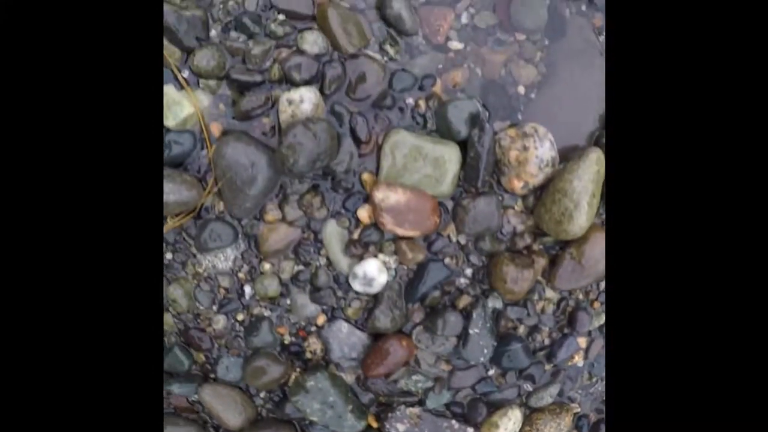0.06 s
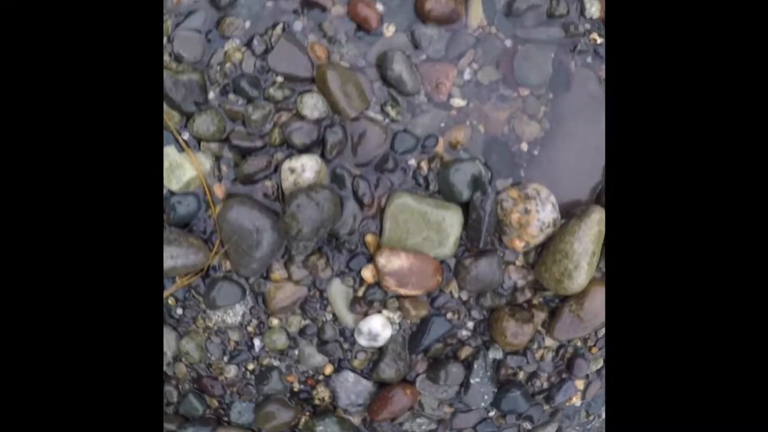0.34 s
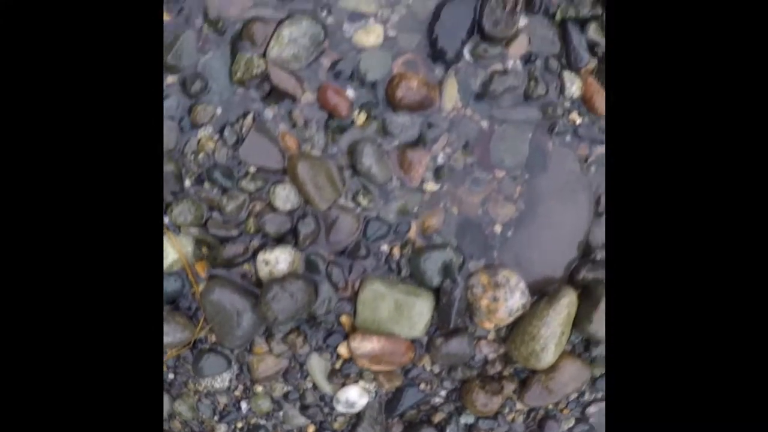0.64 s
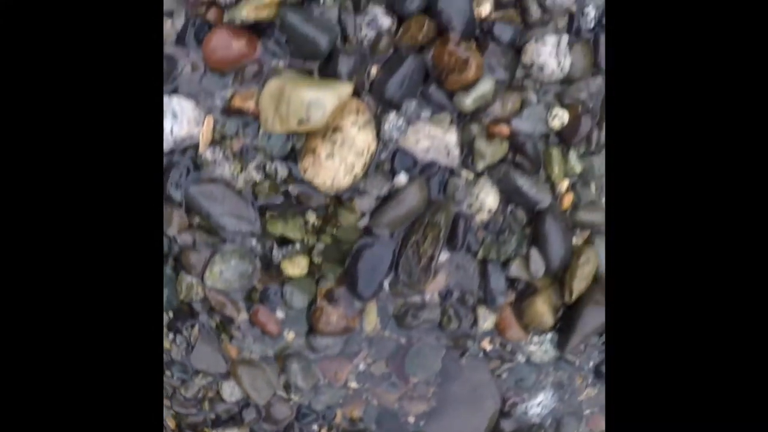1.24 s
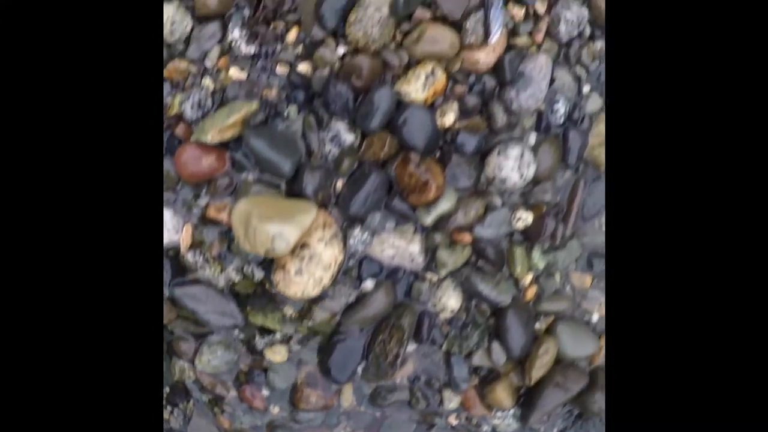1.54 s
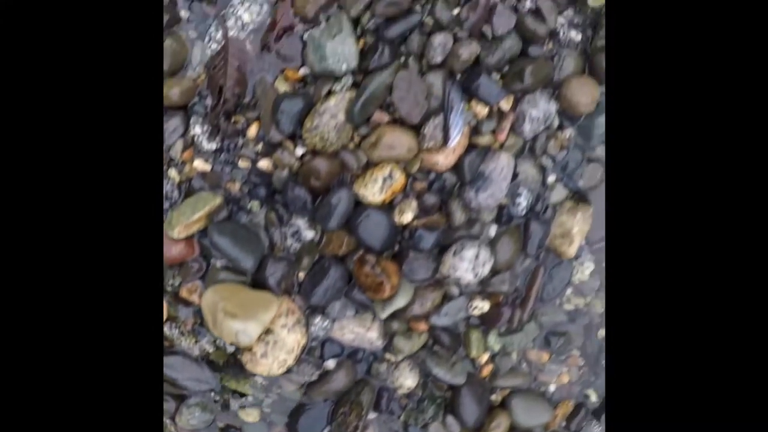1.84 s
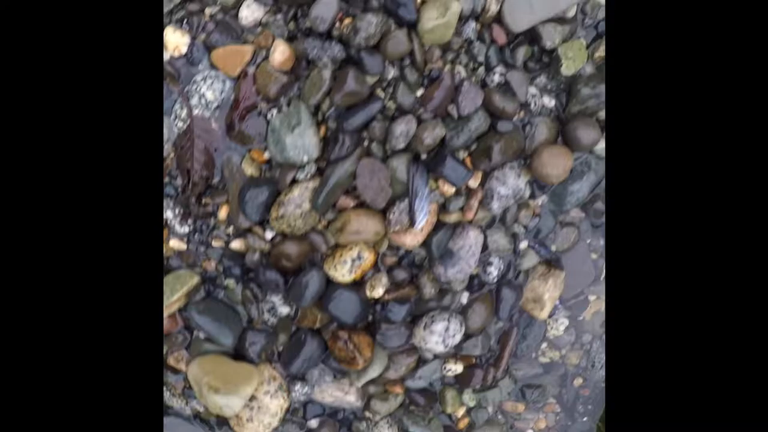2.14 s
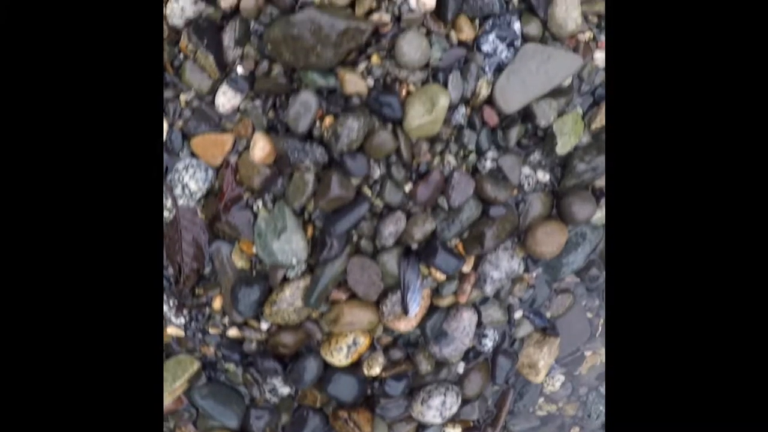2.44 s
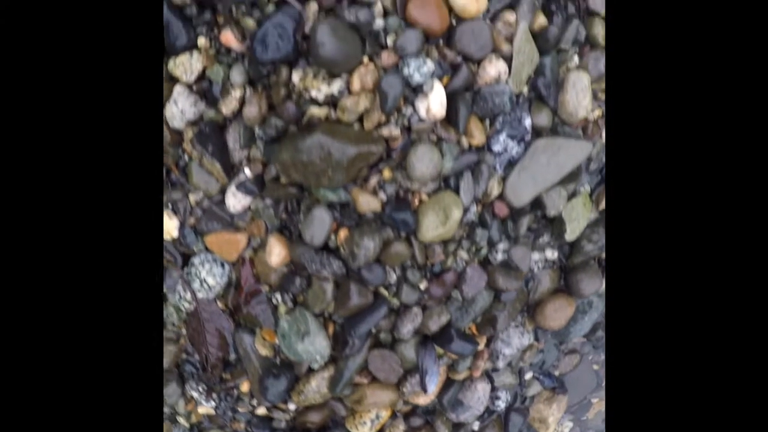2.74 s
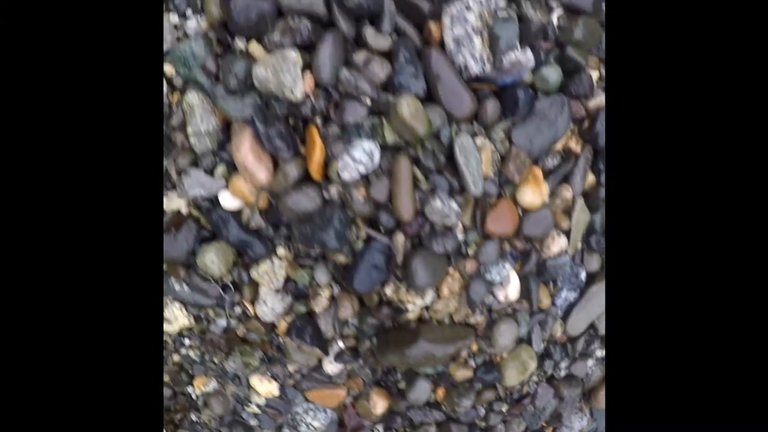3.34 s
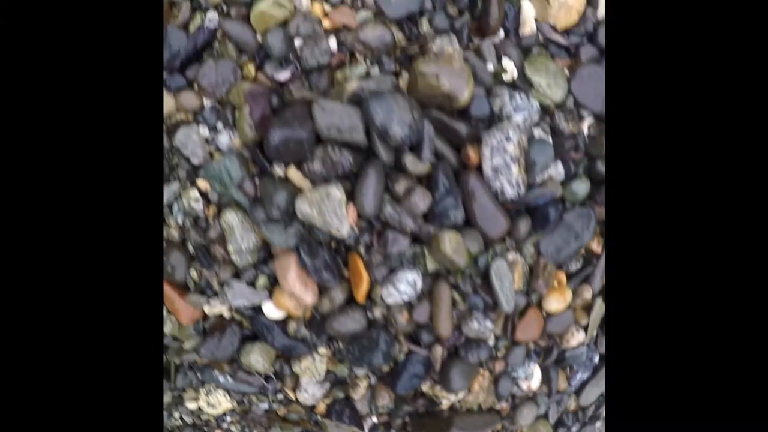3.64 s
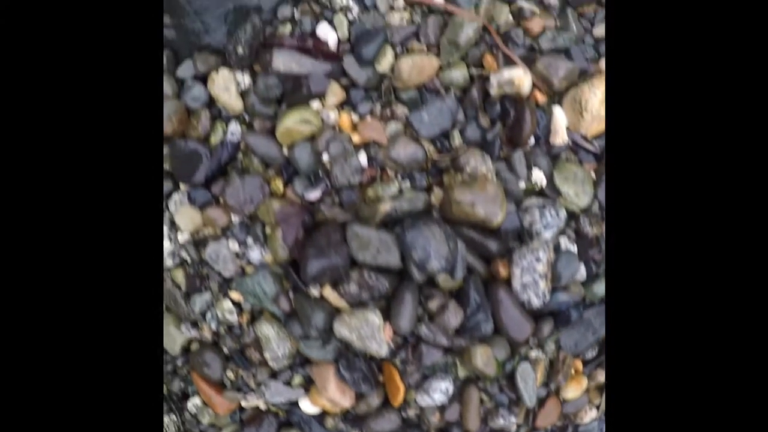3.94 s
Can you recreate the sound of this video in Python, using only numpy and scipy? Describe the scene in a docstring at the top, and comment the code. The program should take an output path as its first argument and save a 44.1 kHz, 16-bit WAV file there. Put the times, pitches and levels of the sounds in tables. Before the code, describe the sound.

Slow footsteps crunch on a wet pebble beach. The first sinks into fine, hissing shingle; the next ones grind coarser stones that knock, click and skid. Low wind rumbles on the close microphone over a faint wash of water.

```python
"""Slow footsteps on a wet pebble beach.

The first step sinks into wet, fine shingle; the next ones grind coarser pebbles, which knock,
click, ring and skid. The crunch is many small stone contacts, each ringing briefly.
Low wind rumbles on two microphones pointing at the ground, over a faint wash of water."""
import sys
import numpy as np
from scipy import signal
from scipy.fft import rfft, irfft, next_fast_len
from scipy.io import wavfile
from scipy.ndimage import uniform_filter1d

SR = 44100
rng = np.random.default_rng(int(sys.argv[2]) if len(sys.argv) > 2 else 0)


def generate_wav(sig):
    """Save sig (samples, or channels by samples) to the path in sys.argv[1] as 16-bit PCM at SR."""
    pcm = np.round(np.clip(np.atleast_2d(sig).T, -1, 1) * 32767).astype(np.int16)
    wavfile.write(sys.argv[1], SR, pcm)


N = 176400
TIME_S = np.arange(N) / SR
FFT_SIZE = next_fast_len(N + SR // 4)
BIN_HZ = np.maximum(np.arange(FFT_SIZE // 2 + 1) * SR / FFT_SIZE, 1)
TOP_HZ = 8400


def from_db(db):
    """Decibels to gain."""
    return 10 ** (np.asarray(db) / 20)


def envelopes(rows):
    """One gain curve over time per dB column."""
    times_s, *columns = np.transpose(rows)
    return [from_db(np.interp(TIME_S, times_s, db)) for db in columns]


def per_bin(points):
    """Table interpolated over log frequency."""
    hz, value = np.transpose(points)
    return np.interp(np.log(BIN_HZ), np.log(hz), value)


def minimum_phase(colour):
    """Causal response of a colour, at unit power gain."""
    gain = from_db(per_bin(colour))
    cepstrum = irfft(np.log(gain / np.sqrt(np.mean(gain ** 2))), FFT_SIZE)
    cepstrum[1:FFT_SIZE // 2] *= 2
    cepstrum[FFT_SIZE // 2 + 1:] = 0
    return np.exp(rfft(cepstrum))


# Left-right likeness: f/Hz, coherence
COHERENCE = [(60, 0.91), (500, 0.97), (1350, 0.91), (1850, 1), (2150, 1), (2600, 0.34), (3400, 0.8),
             (4700, 0.23), (5700, 0.16), (8000, 0.098)]
def to_stereo(pair, colour, scatter=1):
    """Colour a direct and a scattered signal; mix them as mid and side."""
    direct, scattered = rfft(pair, FFT_SIZE) * minimum_phase(colour)
    side_share = np.clip(scatter * (1 - per_bin(COHERENCE)) / 2, 0, .5)
    mid = np.sqrt(1 - side_share) * direct
    side = np.sqrt(side_share) * scattered
    return irfft([mid + side, mid - side], FFT_SIZE)[:, :N]


# Wind strength: t/s, level/dB
WIND_LEVEL = [(0, -25), (.3, -35), (.7, -30.5), (1.1, -34.5), (1.8, -38.5), (2.4, -38.5), (2.8, -32),
              (3.05, -39), (3.5, -47), (3.7, -40), (4, -50)]
# Wind and water spectra: f/Hz, relative level/dB
WIND_COLOUR = [(6, -14.5), (14, 1.5), (26, 3), (42, -10.5), (69, 0.5), (82, -5.5), (100, -6.5), (135, -23),
               (300, -31), (700, -69)]
WASH_COLOUR = [(100, 2.5), (700, 0.5), (1300, -5.5), (2200, -10), (3400, -9), (4000, -1), (4800, -2.5),
               (5700, -12), (7000, -19), (7800, -48)]
def shore():
    """Wind rumbles on the microphones over a steady wash of water."""
    gusts, = envelopes(WIND_LEVEL)
    wind = to_stereo(gusts * rng.standard_normal((2, N)), WIND_COLOUR)
    wash = to_stereo(rng.standard_normal((2, N)), WASH_COLOUR)
    return wind + from_db(-62) * wash


def contacts(per_s, spread_db):
    """Random stone contacts of uneven size, with the running RMS held at 1."""
    sizes = from_db(spread_db * np.minimum(rng.exponential(1, N), 3))
    clicks = sizes * (rng.random(N) < per_s / SR)
    power = np.maximum(uniform_filter1d(clicks ** 2, size=2600), 0)
    return clicks / np.sqrt(power + 1e-6)


def pebbles(per_s, spread_db, t60_cycles, rub_db):
    """Each contact rings short modes at random strengths, over smooth rubbing noise."""
    clicks = contacts(per_s, spread_db)
    hits = np.flatnonzero(clicks)
    modes_hz = np.geomspace(120, 9000, 40)
    out = np.zeros((2, N))
    for hz, spacing_hz in zip(modes_hz, np.gradient(modes_hz)):
        strengths = rng.standard_normal((2, len(hits))) * np.sqrt(rng.exponential(1, len(hits)))
        drive = np.full((2, N), 1e-18)
        drive[:, hits] = clicks[hits] * strengths
        radius = from_db(-60 * hz / (t60_cycles * SR))
        gain = np.sqrt((1 - radius ** 2) * spacing_hz / SR)
        feedback = [1, -2 * radius * np.cos(2 * np.pi * hz / SR), radius ** 2]
        out += signal.lfilter([gain, 0, -gain], feedback, drive)
    return out + from_db(rub_db) * rng.standard_normal((2, N))


def chinks(per_s, t60_cycles):
    """Loose pebbles ring briefly, each at one pitch of its own."""
    draws = rng.random((5000, 4))
    sounding = draws[:, 3] < per_s * N / SR / len(draws)
    onset, pitch, size, _ = draws[sounding].T
    hz = 150 * 55 ** pitch
    lengths = (SR * t60_cycles / hz).astype(int)
    pebble = np.repeat(np.arange(len(hz)), lengths)  # all rings laid end to end
    age = np.arange(len(pebble)) - (np.cumsum(lengths) - lengths)[pebble]
    cycles = hz[pebble] * age / SR
    envelope = (1 - np.exp(-cycles)) * from_db(-60 * age / lengths[pebble])
    rings = ((.5 + size) * hz)[pebble] * envelope * np.sin(2 * np.pi * cycles)
    out = np.bincount((onset * N).astype(int)[pebble] + age, rings, minlength=N)[:N]
    return out / np.std(out) * np.sqrt(TOP_HZ / (SR / 2))


def loose(per_s, t60_cycles, db):
    """Ringing pebbles, direct and scattered."""
    return from_db(db) * np.array([chinks(per_s, t60_cycles), chinks(per_s, t60_cycles)])


# Work of the feet on the ground: t/s, deep stones/dB, top pebbles/dB, grit/dB
TREAD_LEVELS = [(0, -46.5, -55, -60), (.34, -49, -53, -73.5), (.55, -44, -45, -81), (.59, -44, -40, -59),
                (.77, -35, -33.5, -41.5), (.92, -33.5, -39.5, -39.5), (1.12, -38, -45, -51.5),
                (1.22, -42.5, -49, -60.5), (1.45, -35.5, -37.5, -50), (1.58, -35.5, -43.5, -41.5),
                (1.63, -47, -48, -50.5), (1.78, -49.5, -56, -59.5), (2.14, -49.5, -52, -60.5),
                (2.26, -39.5, -46, -66), (2.34, -32.5, -35, -49.5), (2.42, -34.5, -33, -53.5),
                (2.48, -29.5, -28.5, -35), (2.53, -30.5, -32, -48), (2.61, -35, -31.5, -50),
                (2.68, -35, -41.5, -57), (2.76, -36, -37, -56), (2.84, -36, -37.5, -56.5),
                (3.12, -41.5, -49, -63.5), (3.17, -31, -43, -56), (3.235, -37, -37, -45),
                (3.29, -35, -42, -53), (3.39, -35.5, -39.5, -44), (3.45, -50.5, -44.5, -47.5),
                (3.54, -50, -54.5, -57), (3.66, -50.5, -51.5, -52.5), (3.86, -48, -56.5, -63.5),
                (4, -39.5, -48, -68)]
# Layer spectra: f/Hz, relative level/dB
DEEP_COLOUR = [(50, -25.5), (170, -1), (320, -7.5), (500, 4), (760, 3), (1000, -6), (4000, -79.5)]
PEBBLE_COLOUR = [(200, -17), (800, -6), (1200, 3), (1500, -3), (1950, -13.5), (2600, -18), (4000, -23),
                 (8000, -83)]
GRIT_COLOUR = [(600, -12), (1800, -5.5), (2600, -1.5), (3400, 2), (4050, -8.5), (4800, -4), (5600, -16),
               (6800, -23), (7700, -58)]
def crunch():
    """Weight shifts deep stones, crunches the top pebbles and grinds the grit between them."""
    deep, top, grit = envelopes(TREAD_LEVELS)
    shifting = pebbles(per_s=380, spread_db=2.5, t60_cycles=6.9, rub_db=-7.5)
    shifting += loose(per_s=400, t60_cycles=21, db=-8)
    crunching = pebbles(per_s=450, spread_db=2, t60_cycles=8.7, rub_db=-7)
    crunching += loose(per_s=740, t60_cycles=53, db=-2.5)
    grinding = pebbles(per_s=600, spread_db=3, t60_cycles=20, rub_db=-3)
    grinding += loose(per_s=600, t60_cycles=150, db=-2.5)
    return (to_stereo(deep * shifting * from_db(-1), DEEP_COLOUR)
            + to_stereo(top * crunching * from_db(-1), PEBBLE_COLOUR)
            + to_stereo(grit * grinding, GRIT_COLOUR, scatter=2))


# Low pulses: t/s, half-width/s, f/Hz, level/dB
THUMPS = [(0.032, 0.014, 61, -32), (0.096, 0.021, 61.3, -20), (0.166, 0.027, 63.7, -22),
          (0.514, 0.027, 69.8, -25), (2.502, 0.015, 53.3, -18.5), (3.635, 0.032, 45.4, -28)]
def thumps():
    """Footfalls and air on the microphones give soft, low pushes."""
    out = np.zeros(N)
    for centre_s, half_width_s, hz, db in THUMPS:
        t = TIME_S - centre_s
        envelope = from_db(db) * np.exp(-(t / half_width_s) ** 2)
        out += envelope * np.cos(2 * np.pi * hz * t + rng.uniform(0, 2 * np.pi))
    return out


def stone_body(burst, click_over_knock_db):
    """A stone favours one pitch; large ones knock more than they click, and ring lower and duller."""
    octaves = .018 * click_over_knock_db + .22 * rng.standard_normal()
    hz = 3410 * 2 ** octaves
    ring = signal.lfilter(*signal.iirpeak(hz, Q=8, fs=SR), burst)
    lowpass = signal.butter(2, min(1.8 * hz, TOP_HZ), fs=SR)
    return signal.lfilter(*lowpass, burst + ring)


# Stone-on-stone hits: t/s, knock/dB, clack/dB, click/dB
STRIKES = [(0.1221, -42.5, -33.5, -43), (0.183, -37.5, -45.5, -67.5), (0.285, -42, -41.5, -69),
           (0.3466, -38, -49, -71.5), (0.387, -35.5, -44.5, -51), (0.57, -30.5, -29.5, -35.5),
           (0.5784, -26, -26, -36), (0.6275, -41.5, -30, -21), (0.684, -39, -26, -28),
           (0.7459, -42, -22, -31), (0.8206, -28, -30.5, -25.5), (0.8656, -29, -32, -25.5),
           (1.15, -28.5, -36, -58), (1.2628, -32.5, -35, -50.5), (1.333, -34.5, -45, -44),
           (1.3865, -29, -29, -45), (1.4415, -30, -30.5, -37.5), (1.673, -32.5, -37, -71),
           (1.822, -40, -41, -35), (1.8529, -41, -46, -38), (1.9073, -41, -35.5, -50),
           (1.9587, -65, -52, -41.5), (2.0288, -37.5, -44.5, -40.5), (2.245, -28.5, -32.5, -36.5),
           (2.319, -37, -35.5, -47), (2.427, -33, -41.5, -32.5), (2.4446, -25.5, -23.5, -39),
           (2.489, -27, -33, -47.5), (2.519, -31.5, -28, -41), (2.539, -27, -28.5, -46),
           (2.5533, -28, -22.5, -33), (2.5587, -25.5, -32, -40.5), (2.5904, -41, -23, -44),
           (2.5968, -33.5, -25.5, -58), (2.6091, -28.5, -21, -50), (2.6366, -29, -28.5, -59),
           (2.8159, -23.5, -28, -44.5), (2.847, -37.5, -26.5, -44), (2.875, -24.5, -25.5, -39.5),
           (2.9049, -23, -28.5, -55), (2.930, -27.5, -31, -65), (3.06, -26.5, -31.5, -51.5),
           (3.156, -26.5, -29, -47.5), (3.18, -31, -33.5, -52), (3.227, -32, -31.5, -43),
           (3.333, -27.5, -36, -42), (3.369, -33, -36, -43), (3.391, -29.5, -23, -29.5),
           (3.411, -28.5, -38, -23), (3.4184, -39, -37.5, -28), (3.4381, -42.5, -51, -40),
           (3.4766, -44, -41.5, -36.5), (3.512, -55, -48.5, -37.5), (3.581, -52.5, -39.5, -37),
           (3.6085, -45, -38.5, -31), (3.652, -30, -50, -41.5), (3.724, -32, -37, -43),
           (3.7743, -64.5, -44.5, -45), (3.7987, -49, -46, -42.5)]
def strike_band(colour, column, t60_s, gain_db, crack_db):
    """One register of the strikes: a hard first touch, a brief chatter and a faint settling rattle."""
    lag_s, rise_s, energy_s = .00036, .00024, .006
    t = TIME_S[:4096]
    chatter = from_db(-60 * t / t60_s)
    settling = from_db(-21 - 60 * t / .05)
    envelope = (1 - np.exp(-t / rise_s)) * (chatter + settling)
    response = np.interp(np.fft.rfftfreq(len(t), 1 / SR), BIN_HZ, abs(minimum_phase(colour)))
    out = np.zeros((2, N + SR))
    for row in STRIKES:
        onset_s, knock_db, _, click_db = row
        burst = envelope * rng.standard_normal((2, len(t))) / np.sqrt(np.sum(envelope ** 2))
        burst[0, 0] += from_db(crack_db) * (-1) ** column  # first touch, direct only
        burst = stone_body(burst, click_db - knock_db)
        coloured = irfft(rfft(burst) * response)
        burst /= np.sqrt(np.sum(coloured ** 2, axis=1, keepdims=True) / (energy_s * SR))
        start = int((onset_s + lag_s) * SR)
        out[:, start:start + len(t)] += from_db(row[column] + gain_db) * burst
    return to_stereo(out, colour, scatter=.94)


# Strike spectra: f/Hz, relative level/dB
KNOCK_COLOUR = [(80, -14), (200, -2), (330, -6), (500, 7), (640, -0.5), (800, 0.5), (1100, -13.5),
                (8000, -71.5)]
CLICK_COLOUR = [(600, -14), (1800, -4.5), (2600, 0), (3500, 5), (4100, -0.5), (4800, 2), (5700, -12.5),
                (7000, -12), (8400, -36)]
def strikes():
    """Larger stones hit: a low knock, a clack and a bright click."""
    knock = strike_band(KNOCK_COLOUR, column=1, t60_s=.022, gain_db=-1.5, crack_db=-.5)
    clack = strike_band(PEBBLE_COLOUR, column=2, t60_s=.021, gain_db=-2.5, crack_db=-6.5)
    click = strike_band(CLICK_COLOUR, column=3, t60_s=.02, gain_db=-.5, crack_db=-9)
    return knock + clack + click


# Shingle under the first step: t/s, hiss/dB, churn/dB
WET_STEP_LEVELS = [(0, -98, -47), (.35, -58.5, -53), (.43, -49, -46.5), (.56, -54, -43), (.574, -27.5, -28),
                   (.63, -31.5, -37), (.655, -34, -38), (.74, -25.5, -37.5), (.78, -37, -42.5),
                   (.82, -27, -35), (.9, -30.5, -38), (.96, -41.5, -41), (1.1, -51.5, -48.5),
                   (1.3, -83, -69.5)]
# Wet shingle spectra: f/Hz, relative level/dB
HISS_COLOUR = [(200, -14.5), (600, 7.5), (1300, -0.5), (2000, -5), (3100, 6.5), (4000, -1), (4800, 0),
               (5600, -11), (6400, -10), (7600, -21), (8400, -61)]
CHURN_COLOUR = [(40, -18), (110, -2.5), (220, -4.5), (330, -5.5), (440, -19), (3000, -67.5)]
def wet_step():
    """The sole sinks into wet shingle: a dense spray of tiny contacts over a low churning."""
    hiss, churn = envelopes(WET_STEP_LEVELS)
    spray = from_db(-3.5) * pebbles(per_s=800, spread_db=1.5, t60_cycles=11, rub_db=-5.5)
    spray += loose(per_s=700, t60_cycles=150, db=-4)
    churning = pebbles(per_s=300, spread_db=4, t60_cycles=11, rub_db=-10.5)
    return to_stereo(hiss * spray, HISS_COLOUR, scatter=1.2) + to_stereo(churn * churning, CHURN_COLOUR)


# Stone and hollow modes: t/s, f/Hz, level/dB, t60/s
RING_MODES = [(0.627, 2910, -20, 0.019), (.812, 262, -20, .06), (0.863, 228, -26.5, 0.054),
              (.958, 200, -24.5, 0.066), (1.823, 3080, -30, .025), (2.245, 750, -14.5, 0.024),
              (2.848, 1210, -20, 0.04), (2.902, 503, -31, 0.039), (2.932, 480, -19, 0.04),
              (3.157, 1262, -23.5, 0.046), (3.439, 3770, -18.5, .018), (3.652, 585, -25, 0.071)]
def ringing():
    """Struck stones and the hollows between them ring for a moment."""
    out = np.zeros(N)
    for onset_s, hz, db, t60_s in RING_MODES:
        t = np.maximum(TIME_S - onset_s, 0)
        out += from_db(db - 60 * np.minimum(t / t60_s, 3)) * np.sin(2 * np.pi * hz * t)
    return out


# Pebbles skidding from under the sole: t/s, length/s, start f/Hz, end f/Hz, level/dB
SKIDS = [(2.765, .05, 2200, 1720, -30), (2.799, .06, 1608, 1116, -30.5), (2.82, .025, 2250, 1970, -42),
         (2.868, 0.034, 1280, 1085, -30.5), (3.404, 0.019, 3550, 3545, -19.5),
         (3.434, 0.02, 3710, 2880, -30.5), (3.448, 0.046, 2036, 2434, -41.5)]
def skids():
    """Rapid slips excite one broad resonance that glides as the pebble slides."""
    half_width_hz = 190
    slips = contacts(per_s=450, spread_db=1.5) * np.exp(2j * np.pi * rng.random(N))
    slips = signal.sosfilt(signal.butter(2, half_width_hz, fs=SR, output="sos"), slips)
    slips /= np.std(slips.real)
    out = np.zeros(N)
    for onset_s, length_s, start_hz, end_hz, db in SKIDS:
        progress = np.clip((TIME_S - onset_s) / length_s, 0, 1)
        hz = start_hz * (end_hz / start_hz) ** progress
        carrier = np.exp(2j * np.pi * np.cumsum(hz) / SR)
        out += from_db(db) * np.sin(np.pi * progress) * (slips * carrier).real
    return out


def scene():
    """Shore, feet and stones together."""
    return shore() + crunch() + thumps() + strikes() + wet_step() + ringing() + skids()


# Microphone balance: f/Hz, left over right/dB
MIC_BALANCE = [(60, -2), (110, 1), (190, 8), (330, -1.5), (570, -6), (950, -5.5), (1500, 0.5), (2200, -1),
               (2650, 12.5), (3300, 8.5), (3950, 2), (4500, -8.5), (5200, -14.5), (6200, -6.5),
               (7600, -1.5)]
# Microphone phase: f/Hz, left lead/rad
MIC_LEAD = [(20, 0.04), (200, 0.17), (450, -2.5), (700, -3), (1200, -4.5), (1850, -6), (2300, -5.5),
            (3200, -9.0), (4100, -10), (5300, -7.5), (7500, -10)]
def record(dry):
    """Each microphone has its own colour and delay; the top is cut steeply."""
    balance = from_db(per_bin(MIC_BALANCE))
    left = balance * np.exp(1j * per_bin(MIC_LEAD))
    mics = np.array([left, np.ones_like(left)]) * np.sqrt(2 / (1 + balance ** 2))
    sound = irfft(rfft(dry, FFT_SIZE) * mics, FFT_SIZE)[:, :N]
    lowpass = signal.cheby2(16, 70, TOP_HZ + 600, fs=SR, output="sos")
    return signal.sosfilt(lowpass, sound)


dry = scene()
out = record(dry)
generate_wav(out)
```